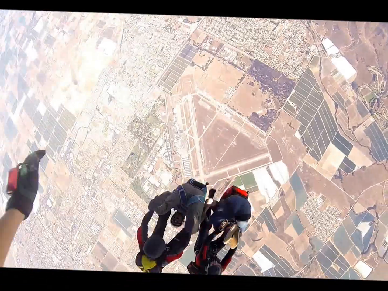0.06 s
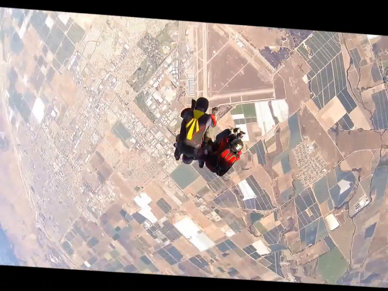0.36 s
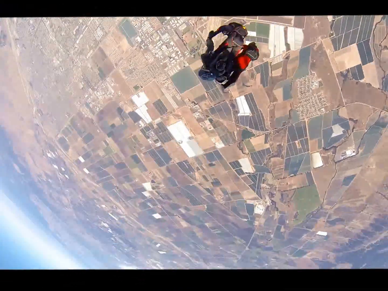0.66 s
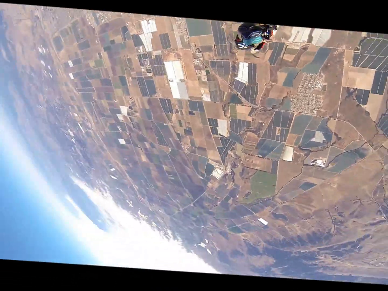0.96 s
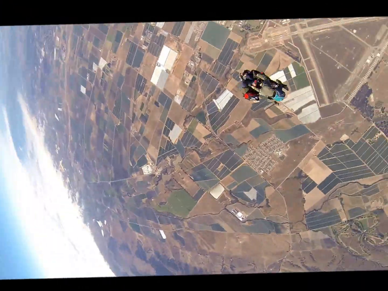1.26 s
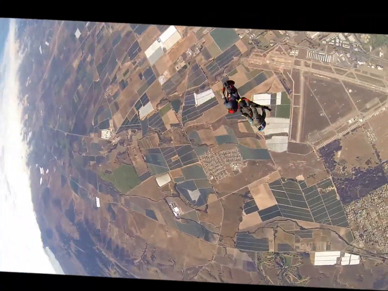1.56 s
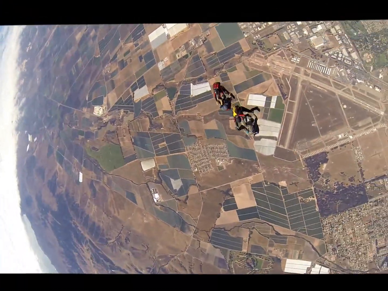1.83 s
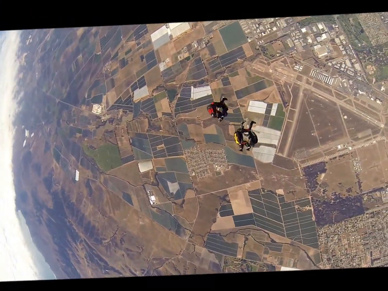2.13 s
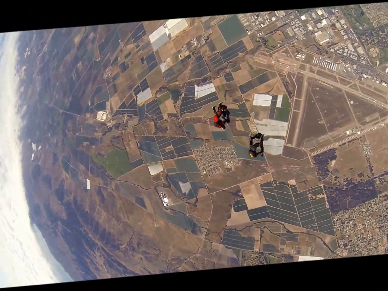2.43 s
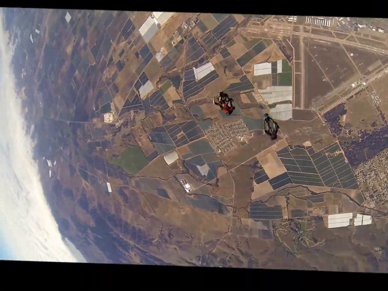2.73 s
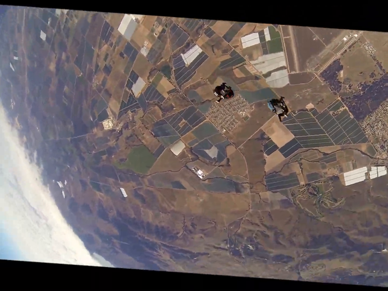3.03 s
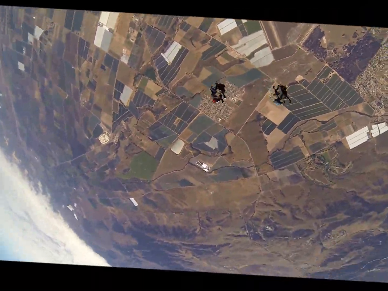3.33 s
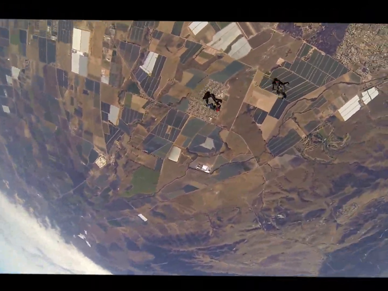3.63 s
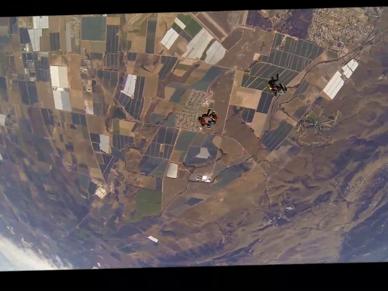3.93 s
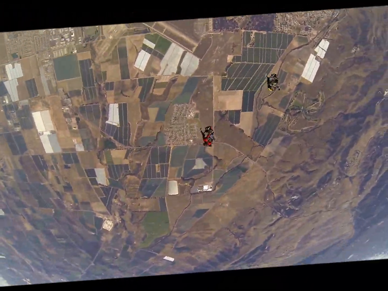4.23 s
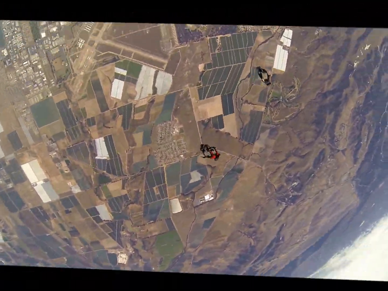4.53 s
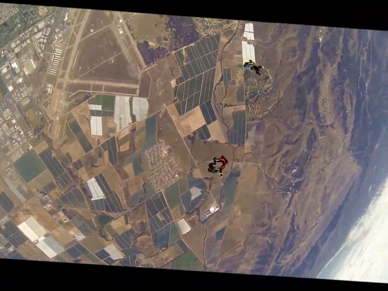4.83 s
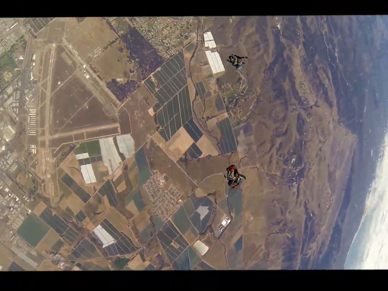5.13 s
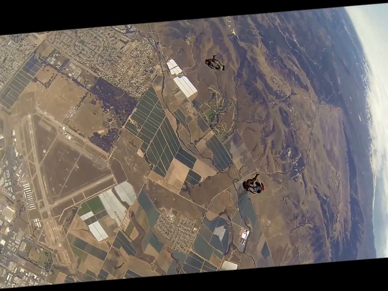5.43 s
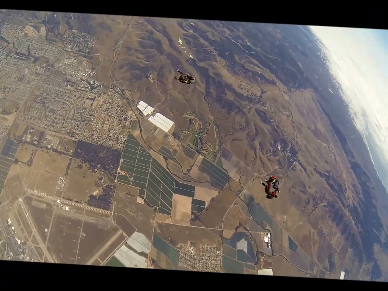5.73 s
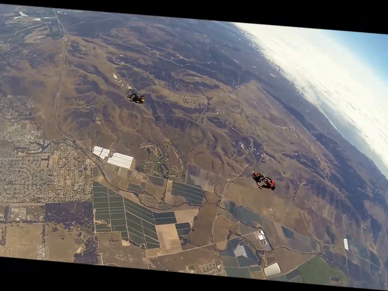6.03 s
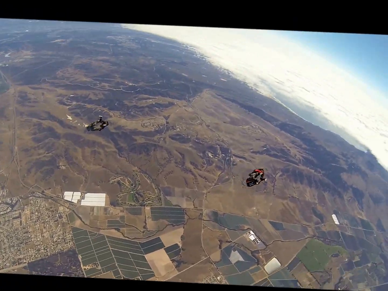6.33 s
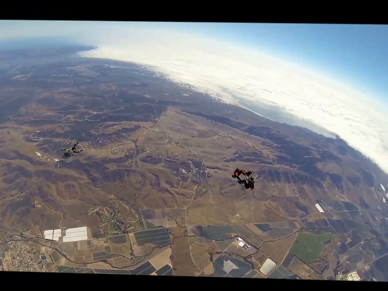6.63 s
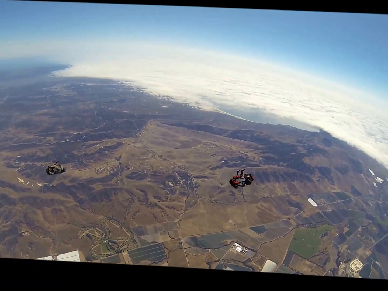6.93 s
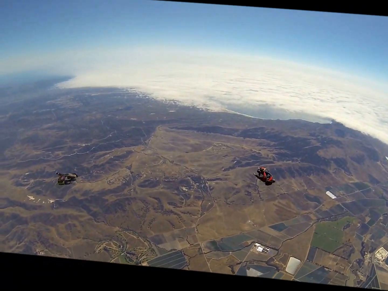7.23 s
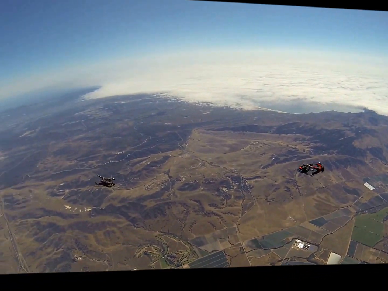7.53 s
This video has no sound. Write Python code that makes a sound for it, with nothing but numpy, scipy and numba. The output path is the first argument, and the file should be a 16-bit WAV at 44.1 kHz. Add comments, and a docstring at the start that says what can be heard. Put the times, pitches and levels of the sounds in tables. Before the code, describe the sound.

Wind roars without a break over a camera in a closed housing on a skydiver's helmet. A low throb and boom sit under a rushing hiss, a hoarse howl and a high, wavering whistle. Big gusts thump at the start, briefly dipping the roar. Around the middle the whistle is strongest, then a low drone hums for about a second. More gusts thump near the end.

```python
"""Open sky, in freefall, heard from a camera in a closed housing on a skydiver's helmet.
Eddies buffet the housing and the wake throbs and booms. On top, the airstream rushes and hisses over
the shell, blows its cavity into a hoarse howl and makes an edge whistle near 3 kHz.
Big gusts thump and the roar ducks behind them, while edges and gaps pipe up briefly. Past the
middle, for about a second, the wake sheds regular vortices and drones."""
import sys
import numpy as np
from scipy import signal
from scipy.fft import rfft, irfft, next_fast_len
from scipy.io import wavfile
from scipy.ndimage import uniform_filter1d, minimum_filter1d, map_coordinates
from numba import njit

SR = 44100
rng = np.random.default_rng(int(sys.argv[2]) if len(sys.argv) > 2 else 0)


def waveform_to_disk(signal):
    """Save audio, clipped to [-1, 1], as 16-bit WAV at the path in sys.argv[1]."""
    frames = np.transpose(np.atleast_2d(signal))
    scaled = np.clip(frames, -1, 1) * 32767
    samples = np.round(scaled).astype(np.int16)
    wavfile.write(sys.argv[1], SR, samples)


N = 338247
T = np.arange(N) / SR

# Sub-bass weight of the largest eddies: frequency_hz, relative_db
BUFFET_SPECTRUM = [(8, -5), (20, -10), (40, -7.5), (56, -5.5), (75, -11.5), (130, -16)]
# Level ride of those eddies, strong in quick turns: time_s, relative_db
BUFFET_RIDE = [(0.0, -19), (0.9, -24), (1.1, -20.5), (2.4, -29), (3.55, -27), (4.3, -28), (4.55, -24.5),
               (5.5, -31), (5.7, -28), (6.4, -29), (6.6, -23.5), (7.65, -25)]
# The throb's spread about the shedding rate: offset_hz, relative_db
THROB_SPECTRUM = [(2, 3), (13, 1), (24, -7.5), (40, -8), (65, -15), (95, -60)]
# Strength of the vortices shed by the helmet: time_s, relative_db
THROB_RIDE = [(0.0, -14.5), (1.0, -25), (2.0, -15), (2.15, -22), (2.45, -17), (3.2, -22.5), (3.4, -17.5),
              (3.8, -20.5), (4.2, -15), (5.05, -19.5), (5.4, -24.5), (6.8, -18.5), (7.1, -21), (7.65, -25)]
# Loose vortex shedding between gusts: time_s, rate_hz
SHEDDING_RATE = [(0, 82), (1.3, 72), (1.95, 95), (3.4, 103), (4.6, 90), (7.67, 84)]
# Brief dropouts of the throb: middle_s, depth_db
THROB_LULLS = [(.35, 10), (.92, 13), (1.44, 18), (2.92, 7), (3.78, 2), (4.69, 7), (6.4, 4), (7.1, 16),
               (7.38, 7)]
# Boom of the wake in the shell: frequency_hz, relative_db
WAKE_SPECTRUM = [(100, -24), (170, -2.5), (235, -5), (310, 0.5), (365, 4.5), (420, -1), (500, -5.5),
                 (680, -5.5), (900, -7), (1100, -4), (2000, -47)]
# How hard the wake churns: time_s, relative_db
WAKE_RIDE = [(0.0, -23), (0.15, -21.5), (0.8, -27.5), (1.0, -32.5), (1.3, -23), (1.45, -28.0), (4.6, -27.5),
             (4.85, -30), (5.4, -26.0), (6.7, -27.5), (7.05, -21.5), (7.65, -23.0)]
# Airstream over the shell as the head turns, against its usual strength: time_s, flow_db
AIRFLOW_RIDE = [(0.0, -2), (0.2, -5), (0.5, -2.5), (0.95, -2.5), (1.15, -0.5), (1.45, -2), (1.7, 1),
                (2.6, 0.5), (4.25, 0), (4.4, -2), (5.25, 2.0), (6.45, 1.0), (6.7, -3), (7.0, -1),
                (7.35, -4), (7.65, -3.0)]
# How squarely the air meets the edges, 0 being head-on: time_s, head_on_db
HEAD_ON_RIDE = [(0, -19), (1.4, -17), (1.85, -10), (2.55, -15), (2.95, -10), (3.85, -0.5), (4.8, -8),
                (6.25, -7), (6.7, -25), (7.67, -29)]
# Midrange body of the airstream: frequency_hz, relative_db
RUSH_SPECTRUM = [(900, -12), (1300, -4), (1580, 4.5), (1800, 0), (2000, -2), (2250, -4), (2420, -5),
                 (2620, -8.5), (3100, -14), (3450, -18), (3800, -21), (6000, -38)]
# Sizzling resonances of the edges: pitch_hz, width_hz, relative_db
SIZZLE_MODES = [(4370, 330, -3), (5014, 470, 1), (5490, 250, 1.5), (6190, 230, -6.5), (6400, 300, -10)]
# Bright spray of the finest eddies: frequency_hz, relative_db
HISS_SPECTRUM = [(1500, -5), (3400, 4.5), (3800, -2.5), (4350, 0.5), (5550, -4), (5900, -6.5), (7100, -6.5),
                 (7750, -12), (8100, -12), (8550, -14.5), (9100, -12.5), (9600, -13), (10000, -15),
                 (10500, -14.5), (11800, -17.5), (12800, -20), (13700, -20.5), (15000, -30)]
# The hiss flares as the helmet swings: middle_s, length_s, boost_db
HISS_FLARES = [(.03, 0.07, 0), (.44, .2, 3), (1.08, 0.17, 2), (2.3, .3, 1), (4.72, 0.056, 4.5),
               (5.5, .15, 1.5)]
# Resonances of the housing's cavity: pitch_hz, width_hz, relative_db
CAVITY_MODES = [(1180, 165, -4), (1266, 135, 0), (1355, 190, -4.5)]
# How hard the cavity's mouth is blown: time_s, relative_db
HOWL_RIDE = [(0.0, -20), (0.75, -21), (1.05, -24), (1.25, -16.5), (1.95, -19.5), (2.1, -18.0), (5.05, -19),
             (5.2, -16.5), (7.65, -17.0)]
# High resonances of edges met head-on: pitch_hz, width_hz, relative_db
SHRILL_EDGE_MODES = [(6180, 320, -2), (6520, 260, -5.5), (7000, 360, -7), (8100, 250, -11),
                     (9100, 500, -15)]
# Big gusts and the duck behind them: middle_s, length_s, thump_db, duck_db
BIG_GUSTS = [(0.106, 0.1502, -14, 4), (0.273, 0.1102, -13, 4.5), (.665, 0.046, -14, 2),
             (0.751, .08, -13.5, 5.5), (1.574, 0.048, -22, 0), (2.37, .06, -21, 1.5),
             (2.547, 0.044, -30, 2), (4.238, .12, -29, 4.5), (4.618, 0.059, -30, 1.5),
             (4.762, 0.042, -20, 4), (6.312, 0.051, -18, 2), (6.55, 0.0774, -22, -0.5),
             (6.9, 0.044, -19, 2), (7.011, .06, -21, 3.5), (7.307, .05, -19, 1.5), (7.421, 0.066, -23, 0),
             (7.598, 0.04, -16, 2)]
# An edge or gap catches the air and pipes up: middle_s, length_s, pitch_hz, width_hz, level_db
PIPING_CUES = [(0.375, 0.049, 2910, 100, -24.5), (.47, .12, 9700, 700, -56), (.51, 0.09, 2920, 220, -25),
               (.5, .12, 4340, 250, -44), (.98, 0.34, 2894, 120, -30.5), (1.1, 0.31, 6860, 800, -45),
               (1.098, 0.15, 2370, 200, -33), (1.68, .2, 3500, 400, -41), (2.1, .8, 7200, 350, -47),
               (2.196, .15, 2880, 120, -34), (2.52, 0.33, 2390, 160, -28), (2.91, .08, 2920, 110, -29),
               (3.744, 0.31, 2866, 109.4, -26), (5.25, .2, 5050, 400, -35), (6.163, 0.047, 2883, 110, -24),
               (6.26, 0.066, 2950, 109.8, -30), (6.5, 0.31, 5490, 250, -41)]
# The shedding locks into a drone: middle_s, length_s, pitch_hz
DRONE_CUES = [(4.24, 0.79, 77.8), (4.93, 0.44, 71.7)]


def undb(db):
    """Decibels to gain."""
    return 10 ** (np.asarray(db) / 20)


def unit(x):
    """Scale to rms 1."""
    return x / np.sqrt(np.mean(x ** 2))


def ride(table):
    """A (time_s, value) table as an automation curve, one value a sample."""
    return np.interp(T, *np.transpose(table))


def swell(middle_s, length_s):
    """A smooth rise and fall, 1 at its middle and above one half for length_s."""
    return np.exp2(-np.minimum((2 * (T - middle_s) / length_s) ** 2, 64))


def walk(rate_hz):
    """Smooth random wander of rms 1 that turns about rate_hz times a second."""
    hold = max(int(SR / rate_hz), 1)
    steps = np.repeat(rng.standard_normal(N // hold + 2), hold)
    return unit(uniform_filter1d(uniform_filter1d(steps, hold), hold)[:N])


def noise(gain_at):
    """Turbulence of rms 1, its spectrum shaped by gain_at(hz)."""
    size = 2 * next_fast_len(N // 2 + 1)
    hz = np.maximum(np.arange(size // 2 + 1) * SR / size, 1)
    return unit(irfft(rfft(rng.standard_normal(size)) * gain_at(hz))[:N])


def coloured(spectrum):
    """Broad turbulence with a (frequency_hz, relative_db) spectrum that rolls off beyond its ends."""
    points_hz, db = np.transpose(spectrum)

    def gain_at(hz):
        skirts = np.minimum(hz / points_hz[0], 1) * np.minimum(points_hz[-1] / hz, 1) ** 2
        return undb(np.interp(np.log(hz), np.log(points_hz), db)) * skirts
    return noise(gain_at)


def ringing(modes):
    """Turbulence ringing steep (pitch_hz, width_hz, relative_db) resonances, whose powers add."""
    def gain_at(hz):
        peaks = (undb(db) / (1 + ((hz / f - f / hz) * f / width) ** 2) for f, width, db in modes)
        return np.sqrt(sum(peak ** 2 for peak in peaks))
    return noise(gain_at)


def steadied(x, span_s):
    """An evenly fed oscillation: its power holds over span_s, while it stays rough within."""
    power = uniform_filter1d(np.abs(x) ** 2, size=max(int(span_s * SR), 1))
    return x / np.sqrt(power + 1e-9)


def waver(x, depth, rate_hz):
    """Pitch follows the unsteady air speed: play x slightly faster and slower."""
    playhead = np.cumsum(1 + depth * walk(rate_hz))
    return map_coordinates(x, [playhead], order=3, mode="mirror")


def buffet(thump):
    """Slow pressure blows of the largest eddies; every gust adds weight."""
    gain = np.hypot(undb(ride(BUFFET_RIDE) + 1), thump * undb(-6))
    return gain * steadied(coloured(BUFFET_SPECTRUM), span_s=0.144)


def throb(throb_db, gustiness, gust_rise_hz=15, flutter_db=1.9):
    """Vortices leave the helmet at a loose rate, faster in gusts; the drone takes over as they lock."""
    lull_db = sum(depth_db * swell(s, length_s=0.074) for s, depth_db in THROB_LULLS)
    gain = undb(throb_db - lull_db + flutter_db * walk(11))
    shed_hz = ride(SHEDDING_RATE) + gust_rise_hz * gustiness
    phase = 2 * np.pi * np.cumsum(shed_hz) / SR
    swirl = steadied(coloured(THROB_SPECTRUM) + 1j * coloured(THROB_SPECTRUM), span_s=0.065)
    loose = np.sqrt(2) * np.real(swirl * np.exp(1j * phase))
    tone, locked_share = drone()
    return gain * (np.sqrt(np.clip(1 - locked_share, 0, 1)) * loose + tone)


def churn(throb_db):
    """The wake booms in the shell; where it is strong, big vortices break up in it and thud."""
    wake_db = ride(WAKE_RIDE)
    boom = steadied(coloured(WAKE_SPECTRUM), span_s=0.14) * undb(0.67)
    breakup_db = 0.5 * (wake_db - wake_db.max()) + 0.34 * (throb_db - throb_db.max())
    thud = ringing([(178, 120, -2.5), (312, 53, 0)]) * undb(breakup_db - 2.5)
    return undb(wake_db) * (boom + thud)


def rush(rush_db):
    """Air streaming over the shell: the broad midrange bed."""
    return coloured(RUSH_SPECTRUM) * undb(rush_db)


def sizzle(flow_db, facing_db):
    """The edges ring in the treble, hotter as the air hits them harder and more squarely."""
    return ringing(SIZZLE_MODES) * undb(-38.5 + 1.3 * flow_db + 0.24 * facing_db)


def hiss(flow_db, facing_db, grain_db=0.96):
    """The finest eddies break on the shell in dense, tiny bursts, flaring as the helmet swings."""
    flare_db = sum(db * swell(s, length_s) for s, length_s, db in HISS_FLARES)
    level_db = -33 + 1.36 * flow_db - 0.099 * facing_db + flare_db
    return coloured(HISS_SPECTRUM) * undb(level_db + grain_db * walk(1500))


def howl(howl_db):
    """The housing's cavity, blown like a bottle: a hoarse, wide tone."""
    tone = waver(ringing(CAVITY_MODES), depth=0.00512, rate_hz=12)
    return undb(howl_db - 0.42) * steadied(tone, span_s=0.087)


def overblown(rush_db, flow_db, facing_db, blown_db):
    """Blown hard along its edges, the cavity also sounds a higher mode."""
    drive_db = 0.54 * flow_db + 0.19 * facing_db + 0.38 * np.minimum(blown_db, 0)
    return ringing([(1520, 290, 0)]) * undb(rush_db - 2.5 + drive_db)


def whistle(flow_db, head_on_db, pitch_hz=2907, flicker_db=1.5):
    """An edge tone that catches and lets go: a narrow core in a breathy halo."""
    tone = waver(ringing([(pitch_hz, 120, 0), (pitch_hz, 330, -9)]), depth=0.005, rate_hz=22)
    level_db = -27.5 + 0.42 * (flow_db + head_on_db)
    return steadied(tone, span_s=0.086) * undb(level_db + flicker_db * walk(16))


def shrill(head_on_db):
    """Air meeting the edges head-on draws a thin, high ring from them."""
    return ringing(SHRILL_EDGE_MODES) * undb(-40 + head_on_db)


def airstream():
    """The upper layers, played by the airflow, its angle to the edges and its push on the cavity."""
    flow_db, head_on_db, howl_db = ride(AIRFLOW_RIDE), ride(HEAD_ON_RIDE), ride(HOWL_RIDE)
    facing_db = head_on_db - head_on_db.mean()
    blown_db = howl_db - howl_db.mean()
    rush_db = -22.5 + 0.87 * flow_db + 0.52 * blown_db - 0.13 * facing_db
    bed = rush(rush_db) + sizzle(flow_db, facing_db) + hiss(flow_db, facing_db)
    cavity = howl(howl_db) + overblown(rush_db, flow_db, facing_db, blown_db)
    edges = whistle(flow_db, head_on_db) + pipings() + shrill(head_on_db)
    return bed + cavity + edges


def gusts(duck_lag_s=0.029, duck_attack_s=0.042):
    """Envelopes of the big gusts: their pressure, the duck behind them, and gustiness (about 1 each)."""
    thump = duck_db = gustiness = 0
    for middle_s, length_s, thump_db, depth_db in BIG_GUSTS:
        blow = swell(middle_s, length_s)
        thump += undb(thump_db) * blow
        gustiness += blow
        deepest_s = middle_s + duck_lag_s
        duck_db += depth_db * swell(deepest_s, np.where(T < deepest_s, duck_attack_s, length_s))
    return thump, duck_db, gustiness


def gust_thud(thump):
    """Each big gust lands on the housing with a dull knock."""
    return ringing([(194, 103, 0)]) * thump * undb(-12.5)


def pipings():
    """Edges and gaps catch the air as the head turns: short, wavering whistles."""
    pipes = sum(undb(db) * swell(middle_s, length_s) * ringing([(pitch_hz, width_hz, 0)])
                for middle_s, length_s, pitch_hz, width_hz, db in PIPING_CUES)
    return waver(pipes, depth=0.005, rate_hz=18)


def drone(grip=0.92, max_share=0.78):
    """Vortices lock into step and hum: the low tone, and the share of the throb's power it takes."""
    tone = locked_share = 0
    for middle_s, length_s, pitch_hz in DRONE_CUES:
        share = np.minimum(grip * swell(middle_s, length_s) ** 2, max_share)
        phase = 2 * np.pi * np.cumsum(pitch_hz * (1 + 0.012 * walk(24.7))) / SR
        tone += np.sqrt(2 * share) * np.sin(phase)
        locked_share += share
    return tone, locked_share


def scene():
    """The mono mix: a low end under a roar that quick eddies shake and big gusts duck."""
    thump, duck_db, gustiness = gusts()
    throb_db = 20 * np.log10(np.hypot(undb(ride(THROB_RIDE) - 0.7), thump))
    low_end = buffet(thump) + throb(throb_db, gustiness) + gust_thud(thump)
    wake = churn(throb_db)
    shake_db = 0.6 * walk(45)
    roar = undb(shake_db - duck_db) * (wake + airstream())
    return (low_end + roar)[None]


@njit
def peak_follower(x, release):
    """Jumps to each peak and sinks back slowly."""
    out, held = np.empty(len(x)), 0.
    for i in range(len(x)):
        held = max(abs(x[i]), held * release)
        out[i] = held
    return out


def limiter(x, ceiling_db, release_s):
    """Eases the gain down just ahead of each peak that would pass the ceiling."""
    held = peak_follower(x, np.exp(-1 / (release_s * SR)))
    gain = 1 / np.maximum(held / undb(ceiling_db), 1)
    return x * uniform_filter1d(minimum_filter1d(gain, size=128), size=128)


def record(dry):
    """The camera limits the peaks and cuts the top above 15.2 kHz."""
    limited = limiter(dry[0], ceiling_db=-2.5, release_s=0.11)
    high_cut = signal.ellip(10, 0.2, 80, 15200, fs=SR, output="sos")
    return signal.sosfilt(high_cut, limited)[None]


dry = scene()
out = record(dry)
waveform_to_disk(out)
```